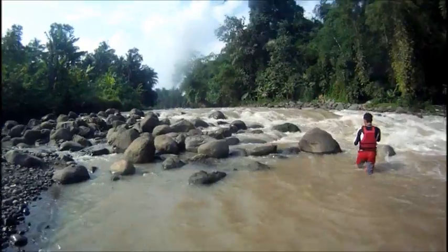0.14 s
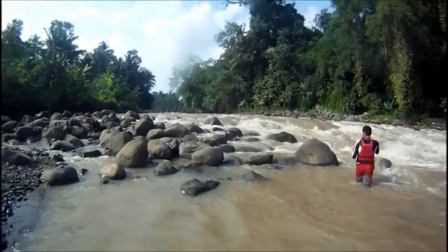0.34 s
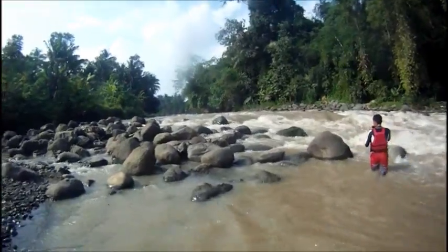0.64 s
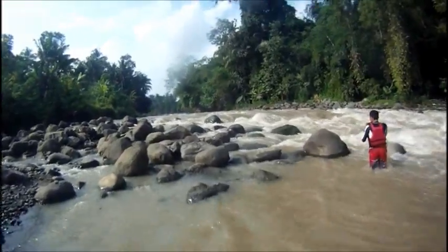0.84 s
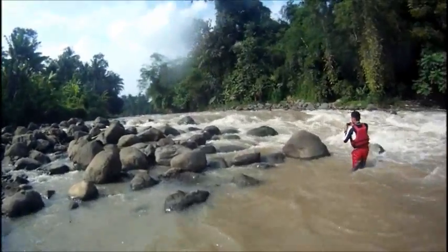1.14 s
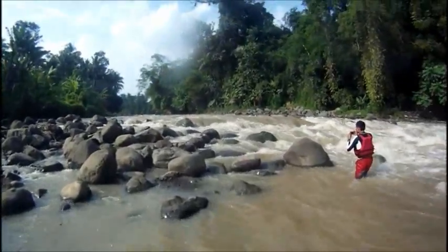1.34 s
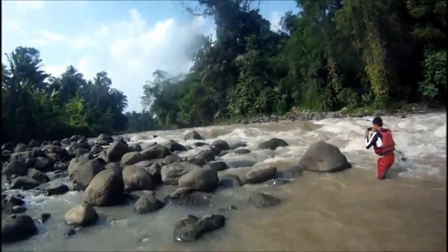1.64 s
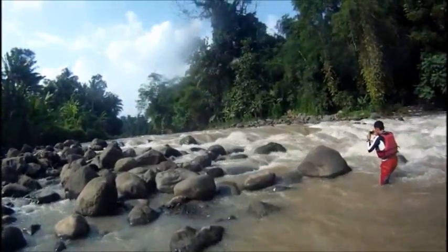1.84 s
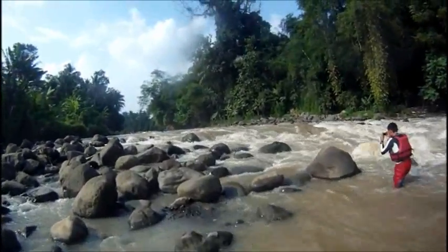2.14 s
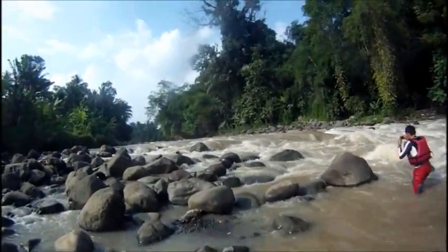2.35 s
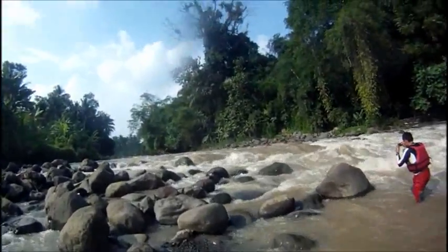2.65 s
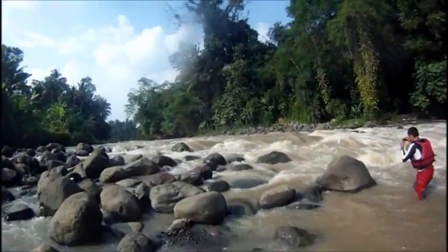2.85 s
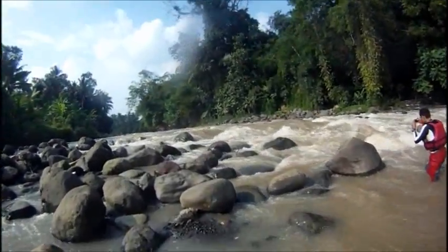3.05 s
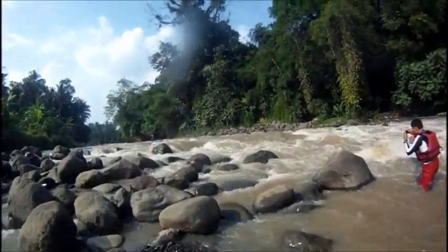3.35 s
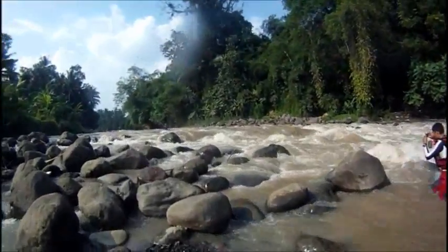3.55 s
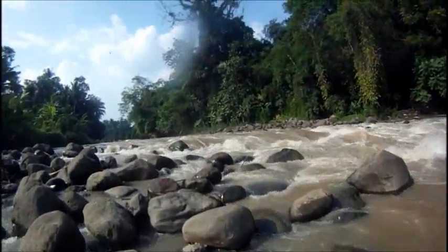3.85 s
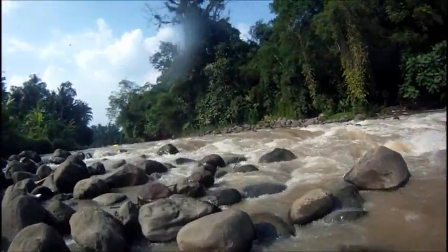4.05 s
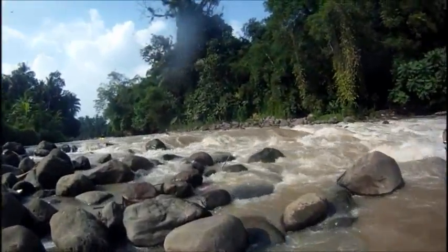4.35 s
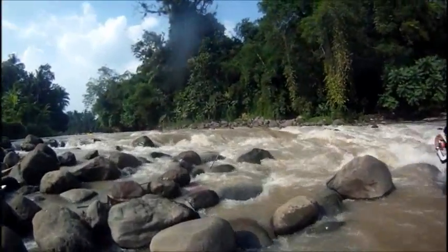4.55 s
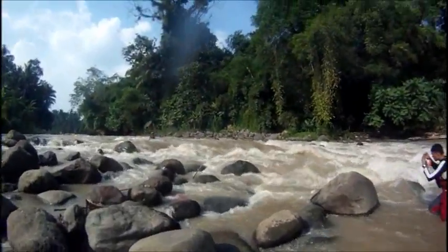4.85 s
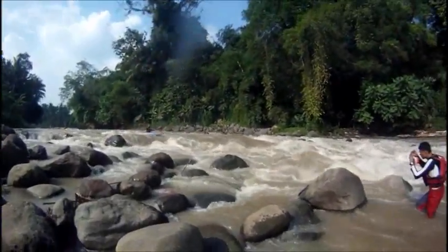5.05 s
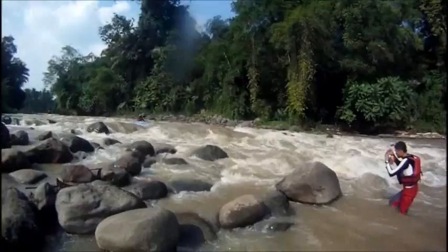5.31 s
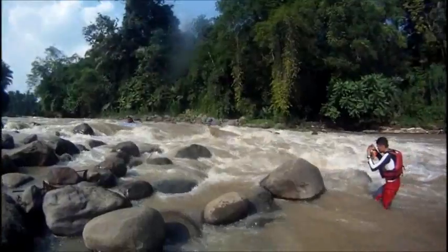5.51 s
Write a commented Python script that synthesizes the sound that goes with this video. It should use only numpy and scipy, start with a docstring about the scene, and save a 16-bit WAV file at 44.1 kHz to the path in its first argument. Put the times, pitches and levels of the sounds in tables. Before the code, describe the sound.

A rocky river rushes outdoors, with distant rapids roaring and nearer shallows hissing and bubbling. It is heard from the bank through a small handheld camera, which rumbles faintly and gives louder, irregular low thumps and hollow knocks as a loose part shifts inside. Short finger scuffs and a few clicks come in between. The knocks cluster at the start, thin out, then return and peak near the end.

```python
"""A rocky river rushes: far rapids roar, near riffles hiss and bubble.
It is heard from the bank through a small camera, which rumbles faintly in the hand.
As the camera moves, a loose sprung part inside knocks on its stops, rings the case and bounces
at about 60 Hz. Short scuffs rustle, likely fingers rubbing the body, and the housing clicks.
Coarse sampling in the camera adds a glassy treble."""
import sys
import numpy as np
from scipy import signal
from scipy.fft import rfft, irfft
from scipy.io import wavfile

SR = 44100
rng = np.random.default_rng(int(sys.argv[2]) if len(sys.argv) > 2 else 0)


def dump(signal):
    """Clip the signal to [-1, 1] and save it as 16-bit WAV at the path in sys.argv[1]."""
    limited = np.clip(np.atleast_2d(signal).T, -1, 1)
    pcm = np.round(limited * 32767).astype(np.int16)
    wavfile.write(sys.argv[1], SR, pcm)


N = 250488
HOLD_HZ = 12000  # camera sample rate


def amp(db):
    """Decibels to gain."""
    return 10 ** (np.asarray(db) / 20)


def unit(x):
    """Scales to rms 1."""
    return x / np.sqrt(np.mean(x ** 2) + 1e-20)


def add(mix, start_s, sound):
    """Mixes a sound in at start_s."""
    part = mix[max(round(start_s * SR), 0):][:len(sound)]
    part += sound[:len(part)]


def drift(rate_hz):
    """Random wander of rms 1, rolling off at rate_hz."""
    hz = np.fft.rfftfreq(N, 1 / SR)
    return unit(irfft(rfft(rng.standard_normal(N)) * np.exp(-(hz / rate_hz) ** 2), N))


# microphone port resonances: centre_hz, width_hz, gain_db
PORT_PEAKS = [(884, 69, 5), (1503, 182, 8), (2140, 100, 2.5), (3150, 250, 7), (3635, 262, 8.5),
              (5400, 430, 5.5)]
def colour(x, spectrum, bright_db=0):
    """Applies a spectrum, a treble shelf and the port resonances; cuts at half HOLD_HZ."""
    hz = np.fft.rfftfreq(len(x), 1 / SR)
    points_hz, points_db = np.transpose(spectrum)
    shape_db = np.interp(np.log(hz + 1), np.log(points_hz), points_db)
    shape_db += bright_db * np.clip((hz - 2400) / 1000, 0, 1)
    shape_db += sum(db * np.exp(-((hz - centre) / width) ** 2) for centre, width, db in PORT_PEAKS)
    return irfft(rfft(x) * amp(shape_db) * (hz < HOLD_HZ / 2), len(x))


def bubbles(rate_per_s=2200, spread_db=3, cycles=19.2):
    """Small bubbles of uneven strength, each ringing as a short rising note."""
    out = np.zeros(N)
    pitches_hz = np.geomspace(700, 5200, 32)
    for hz in pitches_hz:
        age = np.arange(int(4 * cycles * SR / hz)) * hz / SR / cycles
        note = np.exp(-2 * age) * np.sin(2 * np.pi * cycles * age * (1 + 0.035 * age))
        births = rng.random(N) < rate_per_s / len(pitches_hz) / SR
        strength = amp(-spread_db * np.minimum(rng.exponential(1, N), 4))
        out += signal.oaconvolve(births * strength, note * hz)[:N]
    return unit(out)


# river level as the camera turns: time_s, roar_db, rush_db
RIVER_LEVELS = [(0, -56.5, -47.5), (2, -56, -46.7), (2.5, -56, -47.3), (3.4, -54.8, -46.1),
                (3.9, -55.5, -47.1), (4.65, -53.2, -45.8), (5.68, -54.5, -50.3)]
# far rapids: freq_hz, gain_db
ROAR_SPECTRUM = [(20, -48), (120, -4), (300, 1), (550, -1.5), (1000, 0), (1400, -13), (2200, -22),
                 (5000, -10.5)]
# near riffles: freq_hz, gain_db
RUSH_SPECTRUM = [(200, -17), (800, -19.5), (1400, -23), (2000, -10.5), (2400, -7.5), (2900, -26.5),
                 (4500, -28), (5700, -24)]
def river(bubble_db=-4, surge_db=3, flutter_db=0.87):
    """Far rapids roar in slow surges; near riffles hiss and bubble among the rocks."""
    time_s, roar_db, rush_db = np.transpose(RIVER_LEVELS)
    t = np.arange(N) / SR
    roar = unit(colour(rng.standard_normal(N), ROAR_SPECTRUM))
    roar *= amp(np.interp(t, time_s, roar_db) + surge_db * drift(rate_hz=4.1))
    spray = rng.standard_normal(N) + amp(bubble_db) * bubbles()
    rush = unit(colour(spray, RUSH_SPECTRUM))
    rush *= amp(np.interp(t, time_s, rush_db) + flutter_db * drift(rate_hz=60))
    return roar + rush


# hand rumble: freq_hz, gain_db
RUMBLE_SPECTRUM = [(12, -48), (30, -4), (55, -2.5), (78, -12.5), (140, -18), (400, -55), (1000, -83)]
def handling(level_db=-54, lumpy_db=2):
    """The holding hand keeps up a faint, lumpy rumble."""
    rumble = unit(colour(rng.standard_normal(N), RUMBLE_SPECTRUM))
    return rumble * amp(level_db + lumpy_db * drift(rate_hz=3.8))


def ring(modes, t, detune, uneven_db=2):
    """Decaying modes; where the blow lands detunes them and favours some."""
    draws = rng.standard_normal((len(modes), 2))
    return sum(amp(db + uneven_db * a - 60 * t / t60_s) * np.sin(2 * np.pi * hz * (1 + detune * b) * t)
               for (hz, db, t60_s), (a, b) in zip(modes, draws))


# overtones of the sprung part: pitch_hz, gain_db, t60_s
BOUNCE_MODES = [(91.8, -20, 0.23), (122.4, -49, 0.25)]
def bounce(t, pitch_hz, clack_db, scrape_db, contact_s=0.002, soft_db=-41, grip_db=-33.5):
    """The sprung part swings: a light touch starts it slowly, scraping above grip_db damps it."""
    free_t60_s, scraped_t60_s = 0.23, 0.067
    softness = 1 + 2 / (1 + amp(clack_db - soft_db))
    push = 1 - np.exp(-(t / (contact_s * softness)) ** 2)
    t60_s = scraped_t60_s + (free_t60_s - scraped_t60_s) / (1 + amp(scrape_db - grip_db) ** 2)
    swing = np.cos(2 * np.pi * pitch_hz * t) * amp(-60 * t / t60_s)
    return push * (swing + ring(BOUNCE_MODES, t, detune=0.16))


# hollow modes of the case: pitch_hz, gain_db, t60_s
CASE_MODES = [(184.7, -4, 0.07), (237.6, 2.5, 0.07), (277.6, -19.5, 0.21)]
def case_ring(t, level_db, swell_s=0.0042, heavy_db=-31.5, pivot_hz=213):
    """The case swells into a hollow ring; hits above heavy_db favour its lowest mode."""
    tilt_db_per_octave = 4.3 * max(level_db - heavy_db, 0)
    modes = [(hz, db + tilt_db_per_octave * np.log2(pivot_hz / hz), t60_s)
             for hz, db, t60_s in CASE_MODES]
    swell = 1 - np.exp(-(t / swell_s) ** 2)
    return amp(level_db) * swell * ring(modes, t, detune=0.039, uneven_db=2.5)


# scrape, scuff and click noise: freq_hz, gain_db
BURST_SPECTRUM = [(200, -4), (700, -2.5), (1300, -12.5), (1800, 4), (2400, 1), (2900, -9.5), (4500, -8),
                  (5700, -10)]
def burst(length_s, bright_db, grain_db=2, samples=8192):
    """A grainy puff that swells quickly and dies away; peak rms about 1."""
    age = np.arange(samples) / SR / length_s
    grains = rng.standard_normal(samples) * amp(grain_db * rng.standard_normal(samples))
    swell = 4 * age * np.exp(1 - 4 * age)
    return unit(colour(grains, BURST_SPECTRUM, bright_db)) * swell


# modes of the struck stop: pitch_hz, gain_db, t60_s
STOP_MODES = [(771, -1.5, 0.042), (914, 0, 0.032), (1033, 7.5, 0.017), (1385, -4.5, 0.022)]
def clack(t, clack_db, scrape_db, rise_s=0.0004, low_cut_hz=600):
    """The stop rings and scrapes briefly; it is too small to radiate bass."""
    low_cut = signal.butter(2, low_cut_hz, "highpass", fs=SR, output="sos")
    attack = 1 - np.exp(-t / rise_s)
    stop = signal.sosfilt(low_cut, attack * ring(STOP_MODES, t, detune=0.055, uneven_db=3))
    scrape = signal.sosfilt(low_cut, burst(length_s=0.0036, bright_db=-16.5))
    out = amp(clack_db) * stop / abs(stop).max()
    add(out, 0, amp(scrape_db) * scrape)
    return out


# knocks of the loose part, before trim: start_s, thud_db, bounce_hz, case_db, clack_db, scrape_db
PART_KNOCKS = [(0.17, -10, 61.1, -28, -20, -41), (0.182, -17, 45, -37, -35, -32),
               (.219, -11, 55, -39, -31, -29), (0.2552, -2.5, 76.4, -24, -18, -26.5),
               (.273, -17, 48, -32, -28.5, -32), (.297, -11, 53, -22, -23.5, -21.5),
               (.309, -17, 46.4, -27, -36, -36), (.401, -21.5, 52, -40, -50, -37),
               (.497, -11, 57.7, -29, -22, -45), (.708, -15.5, 58.7, -25, -36, -36.5),
               (.975, -16, 52.6, -37, -38, -44), (1.037, -25, 56.4, -38, -37, -33.5),
               (1.072, -11, 54.7, -30, -32.5, -34.5), (1.2, -33, 56.6, -38, -35.5, -49),
               (1.332, -19.5, 47, -39, -34.5, -31), (1.386, -21.5, 54.3, -45, -52, -46),
               (1.439, -26.5, 52, -32.5, -44, -33.5), (1.667, -29, 47.3, -38, -43, -28),
               (1.7416, -22, 63, -30, -26, -38.5), (1.865, -31, 54.6, -51, -48, -50),
               (2, -30, 51.4, -53, -63, -39), (2.575, -27, 59.5, -35, -30, -49),
               (2.619, -15.5, 53, -34, -24.5, -24), (2.639, -11, 62.4, -33, -33, -54),
               (2.787, -18.5, 61, -29, -31, -33), (3.029, -17, 50.7, -37.5, -30, -23),
               (3.06, -23, 49.3, -55, -64, -41), (3.2051, -10, 64, -22, -24.5, -24.5),
               (3.221, -15, 58.5, -33, -39, -34), (3.309, -16, 49, -40, -41, -35.5),
               (3.363, -8, 59, -25.5, -22.5, -45.5), (3.713, -21, 57, -43, -40, -55),
               (3.9867, -22, 66.3, -28.5, -21.5, -23.5), (4.02, -26, 52.3, -55, -50, -38),
               (4.069, -31, 48, -34, -31.5, -30), (4.094, -7.5, 56.4, -32, -29, -24),
               (4.169, -10, 54.4, -29, -25.5, -31.5), (4.222, -10.5, 47, -30, -33.5, -32),
               (4.26, -44, 47.7, -37, -36, -43), (4.28, -15, 52, -38, -28.5, -34),
               (4.367, -24, 53.4, -55, -58, -33), (4.401, -36, 54, -36, -35, -40),
               (4.481, -29.5, 56, -42.5, -39, -54), (4.686, -17, 49.5, -38, -36.5, -45),
               (4.736, -4, 73, -34, -18, -22), (4.767, -16.5, 54, -38, -46, -55),
               (4.934, -26, 60, -45, -35, -34), (4.944, -3, 71, -23, -17, -14),
               (4.96, -1, 71.6, -22.5, -44, -21.5), (4.979, -19, 73, -23.5, -26.5, -27),
               (5.004, -15, 51.6, -35, -35, -34), (5.0603, -6.5, 62, -29, -19.5, -18),
               (5.112, -13, 66, -34, -36, -30.5), (5.163, -15, 58.4, -34, -36, -33.5),
               (5.193, -20.5, 49, -37.5, -38, -35.5), (5.371, -33, 56.5, -47, -42, -46)]
def knocks(clack_trim_db=-1, scrape_trim_db=-5, catch_s=0.00073):
    """Each knock clacks a stop, rings the case and bounces the part until the next catches it."""
    out, t = np.zeros(N), np.arange(SR // 2) / SR
    ends_s = [row[0] for row in PART_KNOCKS[1:]] + [N / SR]
    for (start_s, thud_db, bounce_hz, case_db, clack_db, scrape_db), end_s in zip(PART_KNOCKS, ends_s):
        until_caught = 0.5 - 0.5 * np.tanh((start_s + t - end_s) / catch_s)
        add(out, start_s, amp(thud_db) * until_caught * bounce(t, bounce_hz, clack_db, scrape_db))
        add(out, start_s, case_ring(t, case_db))
        add(out, start_s, clack(t, clack_db + clack_trim_db, scrape_db + scrape_trim_db))
    return out


# scuffs on the camera body, before trim: start_s, level_db, length_s, bright_db
FINGER_SCUFFS = [(0.184, -35, 0.044, -8.5), (0.666, -36.5, 0.011, -1.5), (.973, -36, 0.025, -2.5),
                 (1.102, -43, 0.054, -2.5), (1.478, -33.5, .01, -5), (1.622, -36, 0.016, -15),
                 (1.715, -37.5, 0.035, -15), (1.749, -27, .013, -11.5), (1.754, -40.5, 0.054, -3),
                 (2.255, -37.5, 0.037, -1), (2.549, -38.5, 0.019, -4), (2.577, -41, 0.069, -6),
                 (2.968, -40, 0.026, 2), (3.055, -41.5, 0.053, -1.5), (3.241, -42, 0.094, -7),
                 (3.757, -41, 0.052, 0), (3.954, -32.5, .009, -2), (4.02, -37.5, 0.05, -1),
                 (4.504, -34.5, 0.0048, -10), (4.583, -41, 0.053, -8)]
def scuffs(trim_db=-2):
    """Short rustling scuffs, likely fingers rubbing the camera body."""
    out = np.zeros(N)
    for start_s, level_db, length_s, bright_db in FINGER_SCUFFS:
        add(out, start_s, amp(level_db + trim_db) * burst(length_s, bright_db))
    return out


# dry housing clicks, before trim: start_s, level_db
HOUSING_CLICKS = [(0.279, -41.5), (0.402, -41), (4.949, -31.5), (4.965, -33), (5.344, -39.5), (5.365, -40)]
def clicks(trim_db=-2):
    """The housing gives short, bright clicks as the grip shifts."""
    out = np.zeros(N)
    for start_s, level_db in HOUSING_CLICKS:
        add(out, start_s, amp(level_db + trim_db) * burst(length_s=0.0064, bright_db=9))
    return out


def scene():
    """River and camera noises at one microphone."""
    return (river() + scuffs() + handling() + knocks() + clicks())[None]


def record(dry):
    """The camera holds each sample, mirroring the sound round HOLD_HZ into a glassy treble."""
    mic_on_s, oversample = 0.04, 4
    low_cut_hz, anti_alias_hz, high_cut_hz = 18, 5700, 15300
    low_cut = signal.butter(2, low_cut_hz, "highpass", fs=SR, output="sos")
    mic = signal.sosfilt(low_cut, dry[0]) * (np.arange(N) > mic_on_s * SR)
    anti_alias = signal.firwin(2401, anti_alias_hz, fs=40 * SR)  # HOLD_HZ / SR = 40 / 147
    coarse = signal.resample_poly(mic, HOLD_HZ, SR, window=anti_alias)
    held = np.repeat(coarse, oversample)
    glassy = signal.resample_poly(held, SR, oversample * HOLD_HZ)[:N]
    high_cut = signal.firwin(401, high_cut_hz, window=("kaiser", 9), fs=SR)
    return signal.oaconvolve(glassy, high_cut, "same")[None]


dry = scene()
out = record(dry)
dump(out)
```